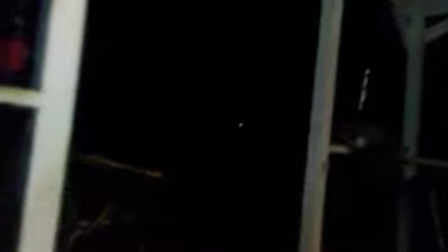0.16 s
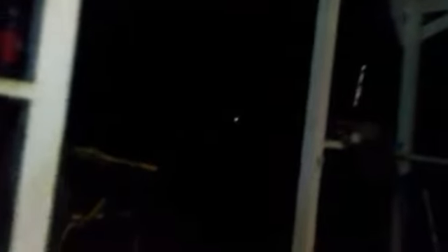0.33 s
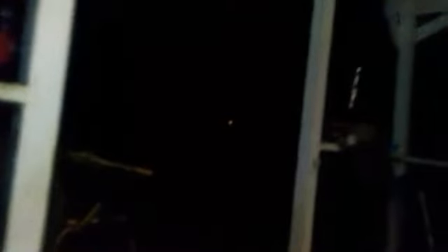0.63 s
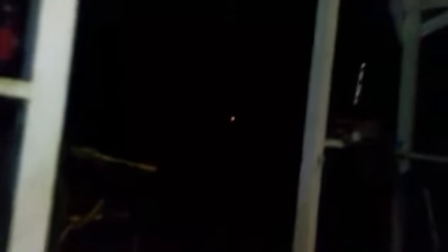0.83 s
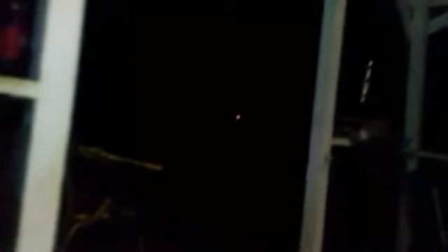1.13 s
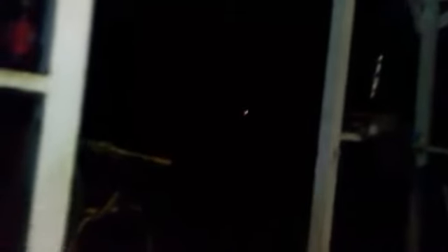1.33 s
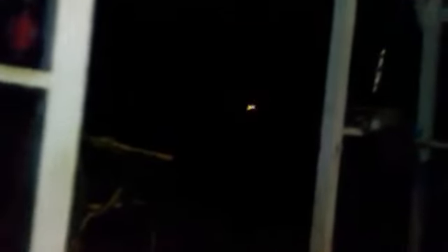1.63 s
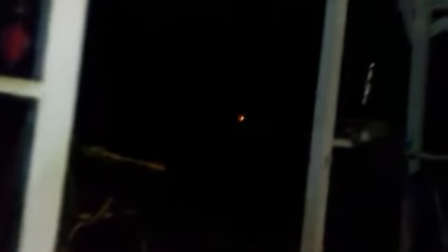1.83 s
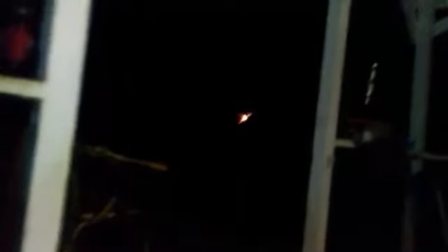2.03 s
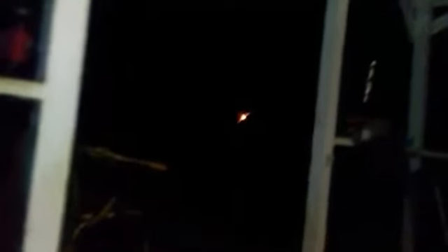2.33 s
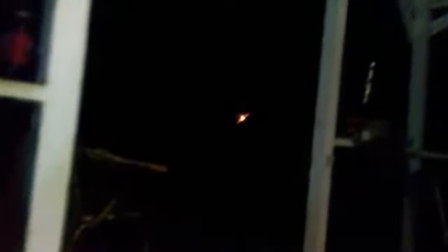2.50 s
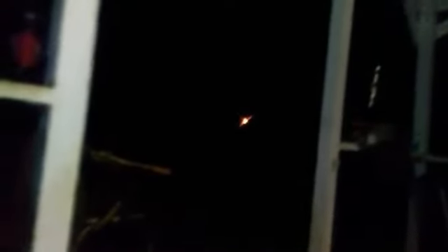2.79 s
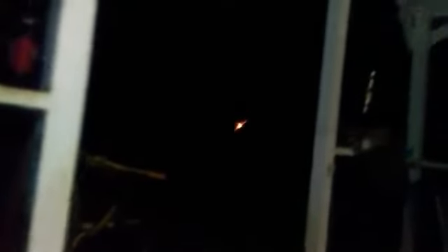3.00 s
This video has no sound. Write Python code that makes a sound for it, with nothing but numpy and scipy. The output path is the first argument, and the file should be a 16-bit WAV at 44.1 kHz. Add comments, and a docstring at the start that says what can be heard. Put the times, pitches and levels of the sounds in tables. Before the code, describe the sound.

A dense chorus of distant frogs throbs steadily with insects rasping above; a nearer frog gives a one-second rattling trill, bright ticks snap close by, and a hinge creaks and bumps at the end, heard from a porch.

```python
"""Night chorus heard from a porch. Throughout, far frogs blur into a throbbing wash of shaped noise,
insects rasp above them, and single fuzzy notes (resonated noise) stand out. Before one second a nearer
frog begins a long pulsed trill, clicks ringing two bands, with a lower, farther one before and after.
From the second second small ticks (filtered impulses) and knocks (decaying modes) fall close by;
at the end a hinge creaks, a gliding tone with overtones over rubbing noise, and bumps."""
import sys
import numpy as np
from scipy import signal
from scipy.fft import rfft, irfft
from scipy.io import wavfile
from scipy.ndimage import uniform_filter1d

SR = 44100
rng = np.random.default_rng(int(sys.argv[2]) if len(sys.argv) > 2 else 0)


def unload_audio(sound):
    """Save the sound as a 16-bit wav file, at the path given as the first command line argument."""
    columns = np.transpose(np.atleast_2d(sound))
    # keep every value between -1 and 1, then stretch to whole-number steps
    steps = np.round(np.clip(columns, -1, 1) * 32767)
    wavfile.write(sys.argv[1], SR, steps.astype(np.int16))


N = 138915  # length [samples]

# Spectra of the background layers: (frequency [Hz], relative density [dB per Hz])
AIR_SPECTRUM = [(15, -69), (25, -29), (64, -8.5), (123, -20), (162, -6.5), (194, -2.5), (232, 3),
                (386, 1.5), (407, -3), (438, 0.5), (652, 4.5), (727, -4), (1900, 0.5), (2470, -6),
                (4180, -120)]
CHORUS_SPECTRUM = [(1000, -61), (1700, -26.5), (2070, -10), (2300, -3.5), (2420, -2.5), (2800, -7),
                   (3330, -1.5), (3500, -0.5), (4000, -5.5), (4230, -9), (4560, -27.5), (4690, -65),
                   (4900, -51), (6370, -71), (10800, -120)]
INSECT_SPECTRUM = [(4600, -60), (4900, -32), (5150, -22.5), (5400, -13.5), (5740, -7.5), (6290, 1),
                   (6640, 3), (7410, -4.5), (8120, -10), (9800, -16.5), (11600, -24.5), (13300, -39),
                   (14000, -51)]
# Loudness courses of chorus and insects, before a trim in scene(): (time [s], level [dB])
CHORUS_COURSE = [(0.0, -25.5), (0.02, -21), (0.17, -26.5), (0.18, -23), (0.42, -27), (0.74, -23.5),
                 (0.94, -27), (1.24, -23), (1.5, -25.5), (1.63, -24.5), (3.03, -25.5), (3.05, -27.5),
                 (3.13, -24.5), (3.15, -29)]
INSECT_COURSE = [(0.0, -44), (0.02, -39), (0.05, -41.5), (0.21, -38), (0.49, -47), (0.6, -41),
                 (0.61, -36.5), (0.82, -38), (1.0, -46), (1.18, -40), (1.65, -38), (2.04, -44),
                 (2.08, -40.5), (2.58, -38), (2.97, -45), (3.15, -39.5)]
THROB_PER_S = 8.8  # centre of the wavering throb rate

# Single notes of the chorus, lower and higher: (time [s], relative level [dB], centre frequency [Hz])
LOW_NOTES = [(0.0154, -12, 2260), (0.0907, -13.5, 2340), (0.174, -15, 2380), (0.3865, -16.5, 2340),
             (0.5057, -19, 2400), (0.5871, -18, 2340), (0.8395, -29, 2390), (0.9956, -17, 2460),
             (1.0884, -13, 2530), (1.1543, -23, 2470), (1.3014, -15, 2330), (1.3773, -25, 2450),
             (1.4461, -7, 2610), (1.5758, -12, 2440), (1.6945, -10, 2530), (1.7714, -16, 2430),
             (1.8342, -18, 2460), (1.9205, -23, 2390), (1.9974, -17, 2380), (2.144, -24, 2300),
             (2.367, -31, 2250), (2.5351, -39, 2400), (2.6414, -16.5, 2290), (2.7631, -21, 2580),
             (2.9667, -28, 2215), (3.0395, -16.5, 2320)]
HIGH_NOTES = [(0.0199, -33, 3520), (0.0937, -15, 3280), (0.166, -11, 3440), (0.2279, -35, 3400),
              (0.3735, -15, 3450), (0.4778, -15.5, 3300), (0.5756, -22, 3470), (0.6524, -15.5, 3290),
              (0.7337, -16, 3300), (0.8056, -17, 3500), (0.9383, -37, 3440), (1.0595, -16, 3450),
              (1.1817, -20, 3330), (1.2984, -12, 3140), (1.4047, -20, 3250), (1.6112, -14, 3220),
              (1.6761, -13, 3430), (1.7684, -11, 3170), (1.8442, -22, 3200), (1.9155, -16, 3450),
              (1.9969, -32, 3530), (2.0612, -13, 3490), (2.1829, -8, 3276), (2.2822, -9.5, 3570),
              (2.4119, -39, 3400), (2.5381, -15, 3750), (2.61, -15.5, 3660), (2.6968, -8, 3320),
              (3.022, -22, 3410), (3.1323, -18, 3410)]
NOTE_RISE_S, NOTE_FALL_S, NOTE_WIDTH_HZ, NOTE_DB = .01, .022, 220, -5

# Snaps: (time [s], level [dB], hiss relative to the snap before colouring [dB])
TICKS = [(1.2316, -27, -32), (1.4278, -19.5, -36), (1.845, -33, -22), (2.0684, -24, -30),
         (2.2953, -10.5, -30), (2.5428, -22, -29), (3.128, -29, -22)]
# Colour of a snap: (frequency [Hz], gain [dB])
TICK_SPECTRUM = [(5000, -30), (6200, -12), (8000, -1), (9000, 0), (11000, -6), (12500, -15), (13600, -28)]
TICK_T60_S, TICK_HISS_HZ = .2, 8500

# Bumps: (time [s], relative level [dB], added level of modes above 600 Hz [dB], factor on ring time)
KNOCKS = [(1.648, -25.5, -18, 1.4), (1.724, -26, 21.5, .6), (1.7441, -17.5, 10, 0.48),
          (1.824, -24, -19, 2.3), (3.117, -1.5, -4, .8), (3.126, -12, 3, 1.3), (3.143, -13, -19, 2.4)]
# Modes of the wooden frame: (frequency [Hz], relative level [dB], T60 before the ring factor [s])
WOOD_MODES = [(215, 0, .045), (300, -1, .05), (460, -5, .025), (680, -4, .018), (1000, -4, .018),
              (1300, -6, .018)]
PUSH_DB, PUSH_S = 3, .0003  # the initial thrust and its time constant

# Gliding hinge tone: (time [s], fundamental frequency [Hz], level [dB])
CREAK = [(2.975, 521, -27.5), (2.992, 574, -29), (3.005, 586, -18), (3.022, 559, -25), (3.034, 592, -33),
         (3.05, 569, -24), (3.062, 594, -22), (3.072, 618, -16), (3.095, 622, -10.5), (3.116, 607, -13),
         (3.124, 610, -28)]
# Overtones of the hinge: (multiple of the fundamental, level relative to it [dB])
CREAK_OVERTONES = [(2, -20), (3, -18.5)]
# Rough rub under the creak: (time [s], relative level [dB], centre frequency [Hz])
RUB = [(2.86, -66, 1160), (2.866, -44, 1050), (2.922, -31.5, 1130), (2.966, -31.5, 1190),
       (2.974, -29.5, 1265), (3.066, -26, 1350), (3.102, -30, 1200), (3.122, -24, 1240), (3.15, -30, 1328)]
# Filter shared by notes, ticks, knocks and hinge: (frequency [Hz], gain [dB])
NEAR_RESPONSE = [(0, -45), (120, -32), (160, -10), (210, 0), (4200, 0), (4600, -14), (4800, -22),
                 (5200, -18), (5800, 0), (22050, 0)]

# Farther, lower trill: (time [s], level [dB], centre frequency [Hz])
FAR_TRILL = [(.76, -69, 1250), (.86, -39.5, 1340), (.98, -43, 1230), (1.05, -72, 1310), (1.74, -34.5, 1150),
             (1.82, -35.5, 1110), (2.0, -36, 1070), (2.12, -41.5, 1010), (2.25, -61, 1050)]
# Near trill: (time [s], low band level [dB], high band level relative to the low band [dB])
TRILL = [(0.94, -47, -7), (1.01, -31.5, 3), (1.096, -29.5, 7.5), (1.108, -33.5, 12.5), (1.134, -27, 7.5),
         (1.448, -27, 7), (1.56, -26.5, 4), (1.83, -28.5, 4.5), (1.84, -28, 1), (1.888, -42, 5),
         (1.95, -56, -2)]
# Two bands of the vocal sac: (frequency [Hz], gain [dB])
SAC_LOW = [(1050, -34), (1200, -9), (1340, 0), (1410, -3), (1490, 5.5), (1600, -5), (1750, -8.5),
           (1950, -35)]
SAC_HIGH = [(2150, -26), (2400, -11), (2540, -6), (2620, -1), (2720, 0), (2800, -4), (2900, -7), (3000, -6),
            (3120, -18), (3400, -32)]
TRILL_PER_S, TRILL_START_S, TRILL_END_S = 52.1, .819, 2
JITTER_LOW_S, JITTER_HIGH_S = .0004, .00004  # rms timing error of the pulses in each band
ECHO_T60_S, ECHO_DB, TRILL_BLUR = .3, 2.5, 1.2  # echo and noise are relative to the clicks

EDGE_HZ = 13500  # upper band limit


def amp(db):
    """Decibel law: 20 dB is a factor of ten in amplitude."""
    return 10 ** (np.asarray(db) / 20)


def evened(x):
    """Normalisation to unit root mean square."""
    return x / np.sqrt(np.mean(x ** 2) + 1e-20)


def curve(rows, col, outside=None):
    """Linear interpolation of one table column over time."""
    rows = np.array(rows)
    return np.interp(np.arange(N) / SR, rows[:, 0], rows[:, col], outside, outside)


def add(mix, s, sound):
    """Superposition of a sound starting at s seconds."""
    part = mix[round(s * SR):][:len(sound)]
    part += sound[:len(part)]


def resonate(x, hz, width):
    """Resonance by heterodyning: shift to 0 Hz, one-pole lowpass, shift back; hz may be a curve."""
    turn = np.exp(2j * np.pi * np.cumsum(hz * np.ones(len(x))) / SR)
    r = np.exp(-np.pi * width / SR)
    slow = signal.lfilter([1 - r], [1, -r], x / turn + 1e-18)
    return 2 * (turn * slow).real


def resonate_twice(x, hz, width):
    """Cascaded equal resonances: the skirts fall twice as steeply in dB."""
    return resonate(resonate(x, hz, width), hz, width)


def coloured(x, points):
    """Linear filtering by a spectrum table, -120 dB outside it."""
    f, db = np.transpose(points)
    hz = np.fft.rfftfreq(len(x), 1 / SR)
    gain_db = np.interp(np.log(hz + 1), np.log(f + 1), db, -120, -120)
    return irfft(rfft(x) * amp(gain_db), len(x))


def blur(points, patchy_db, throb):
    """Superposition of many voices tends to noise: drifting time-frequency patches and a throb in dB."""
    frames = N // 128 + 5
    a, b, patches = rng.standard_normal((frames, 257, 3)).T
    patches = uniform_filter1d(patches, size=5, axis=0)  # across frequency
    patches = evened(uniform_filter1d(patches, size=14, axis=1))  # across time
    cells = (a + 1j * b) * amp(patchy_db * patches)
    x = signal.istft(cells, nperseg=512, noverlap=384)[1][:N]
    return evened(coloured(x * amp(throb), points))


def notes():
    """Narrow-band noise: a resonance turns noise into a fuzzy pitch under a short envelope."""
    out, t = np.zeros(N), np.arange(0, .15, 1 / SR)
    shape = (1 - np.exp(-t / NOTE_RISE_S)) * np.exp(-t / NOTE_FALL_S)
    for s, db, hz in LOW_NOTES + HIGH_NOTES:
        buzz = resonate_twice(rng.standard_normal(len(t)), hz, NOTE_WIDTH_HZ)
        add(out, s, amp(db + NOTE_DB) * shape * evened(buzz))
    return out


def ticks():
    """Impulse and reverberant decay: a bright snap, then a short hiss of reflections."""
    out, t = np.zeros(N), np.arange(8192) / SR
    snap_at = 40  # samples of lead-in
    for s, db, hiss_db in TICKS:
        hiss = evened(resonate(rng.standard_normal(8192), TICK_HISS_HZ, 5200))
        burst = hiss * amp(hiss_db - 60 * t / TICK_T60_S) * (t > .0012)
        burst[snap_at] += 1
        burst = coloured(burst, TICK_SPECTRUM)
        add(out, s - snap_at / SR, amp(db) * burst / abs(burst[:60]).max())
    return out


def knocks():
    """Modal decay: a bump on the wooden frame is a thrust plus exponentially damped modes."""
    out, t = np.zeros(N), np.arange(0, .12, 1 / SR)
    push = amp(PUSH_DB) * t / PUSH_S * np.exp(-t / PUSH_S)
    onset = np.minimum(t / .0008, 1)
    for s, db, upper_db, ring in KNOCKS:
        modes = np.zeros(len(t))
        for hz, mode_db, t60 in WOOD_MODES:
            decay = amp(mode_db + upper_db * (hz > 600) - 60 * t / (ring * t60))
            modes += decay * np.sin(2 * np.pi * hz * t)
        add(out, s, -amp(db) * (modes * onset / 2 + push * amp(upper_db / 2)))
    return out


def hinge():
    """Stick-slip friction: regular slips sing a tone with weak overtones, over a rough rub."""
    phase = 2 * np.pi * np.cumsum(curve(CREAK, 1)) / SR
    drift = uniform_filter1d(uniform_filter1d(rng.standard_normal(N), size=150), size=150)
    rough = 1 + 0.067 * evened(drift)
    overtones = sum(amp(db) * np.sin(k * phase) for k, db in CREAK_OVERTONES)
    tone = rough * np.sin(phase) + overtones
    noise = rng.standard_normal(N)
    moving_rub = evened(resonate_twice(noise, curve(RUB, 2), 240))
    broad_rub = evened(resonate(resonate(noise, 870, 1350), 1150, 870))
    rub = moving_rub + 1.5 * broad_rub
    return np.sqrt(2) * amp(curve(CREAK, 2, -90)) * tone + amp(curve(RUB, 1, -99) - 6.0) * rub


def rattle(sac, jitter_s):
    """Pulse excitation: steady clicks ring one sac band; shifting echoes off the pond smear them."""
    t = np.arange(N) / SR
    starts = np.arange(TRILL_START_S, TRILL_END_S, 1 / TRILL_PER_S)
    timing, strength = rng.standard_normal((2, len(starts)))
    clicks = np.zeros(N)
    clicks[np.round((starts + jitter_s * timing) * SR).astype(int)] = amp(1.1 * strength)
    sparse = rng.standard_normal((2, 6000)) * (rng.random((2, 6000)) < .06)
    tails = sparse * amp(-60 * t[:6000] / ECHO_T60_S)
    # Sine and cosine weights trade the clicks between two echo patterns.
    turn = 2 * np.pi * 1.332 * t
    echoes = sum(signal.oaconvolve(clicks * sway(turn), tail)[:N]
                 for sway, tail in zip((np.sin, np.cos), tails))
    on = (t > TRILL_START_S) * (t < TRILL_END_S)
    haze = TRILL_BLUR * rng.standard_normal(N) * on
    ring = coloured(evened(clicks) + amp(ECHO_DB) * evened(echoes) + haze, sac)
    return evened(ring) * np.sqrt(on.mean())  # unit rms while the trill is on


def trill():
    """Formant bands: the near frog in two, and a farther, lower one before and after as one."""
    high = amp(curve(TRILL, 2)) * rattle(SAC_HIGH, JITTER_HIGH_S)
    near = rattle(SAC_LOW, JITTER_LOW_S) + high
    far_hz = curve(FAR_TRILL, 2)
    far = evened(resonate(resonate(rng.standard_normal(N), far_hz, 390), far_hz, 330))
    return amp(curve(TRILL, 1, -100)) * near + amp(curve(FAR_TRILL, 1, -90)) * far


def scene():
    """Superposition: background layers share one throb; the close sounds share one filter."""
    throb = evened(resonate_twice(rng.standard_normal(N), THROB_PER_S, 6))
    air = amp(-37) * blur(AIR_SPECTRUM, patchy_db=1.63, throb=0.41 * throb)
    chorus = blur(CHORUS_SPECTRUM, patchy_db=0.79, throb=0.45 * throb)
    chorus *= amp(curve(CHORUS_COURSE, 1) + 1.0)
    insects = blur(INSECT_SPECTRUM, patchy_db=1.3, throb=0.56 * throb)
    insects *= amp(curve(INSECT_COURSE, 1) - 0.33)
    close = coloured(notes() + ticks() + knocks() + hinge(), NEAR_RESPONSE)
    return (air + chorus + insects + close + trill())[None]


def record(dry):
    """Band limitation: a linear-phase lowpass removes what lies above the edge."""
    lowpass = signal.firwin(511, EDGE_HZ, window=("kaiser", 9), fs=SR)
    return signal.oaconvolve(dry, lowpass[None], "same")


dry = scene()
out = record(dry)
unload_audio(out)
```